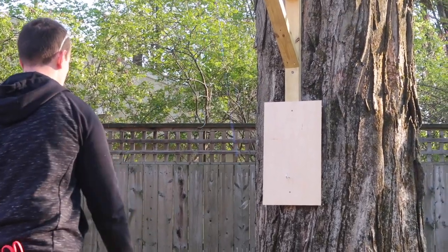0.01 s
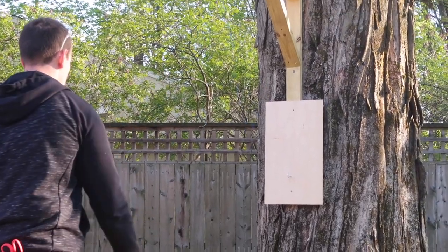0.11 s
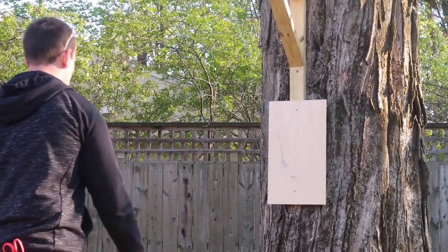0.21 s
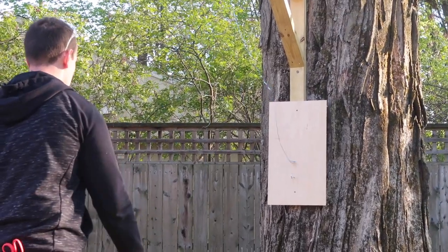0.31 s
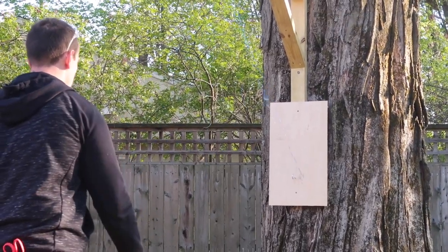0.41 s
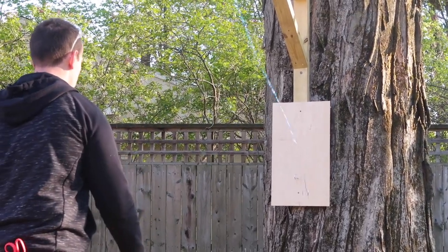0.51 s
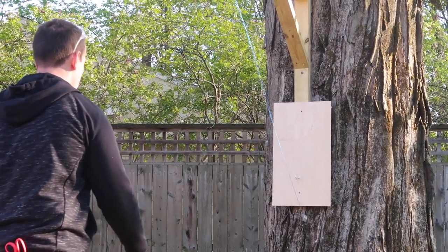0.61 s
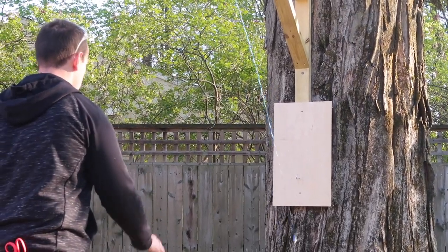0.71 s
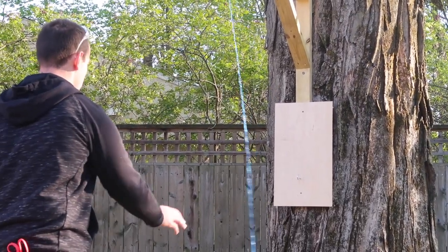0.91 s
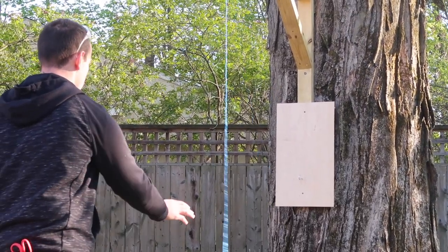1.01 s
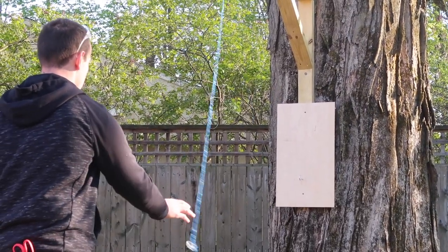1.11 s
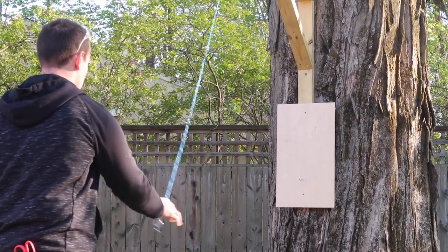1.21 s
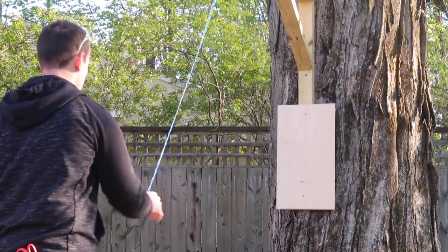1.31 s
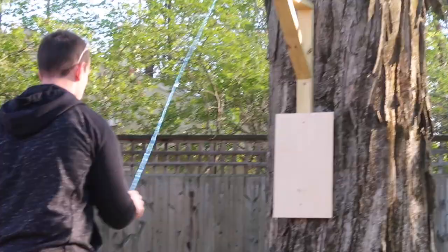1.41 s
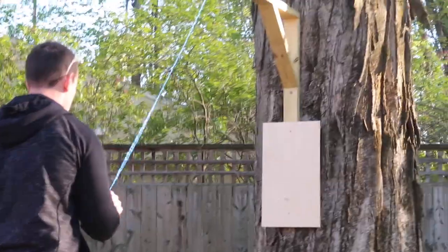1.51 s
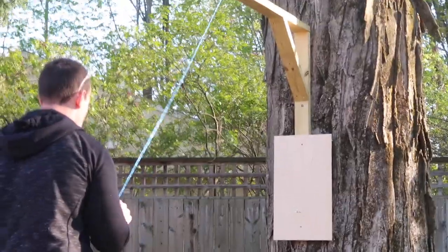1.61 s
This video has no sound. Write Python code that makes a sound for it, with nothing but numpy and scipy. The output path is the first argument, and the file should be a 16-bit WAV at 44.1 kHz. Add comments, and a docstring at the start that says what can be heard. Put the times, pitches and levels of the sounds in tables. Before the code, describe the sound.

One sharp, loud wooden clack at about 0.24 s: a metal ring hits a small board, with a hollow midrange knock and brief noisy crack. Yard echoes follow at once, with a fainter late return near 0.6 s. Low distant traffic, leaves and a wavering engine hum continue, ducked by the blow then recovering. Barely heard ticks come at 0.5 and 1.3 s, a soft rustle at 1.5 s, a clearer small tick at 1.6 s.

```python
"""Metal ring knocking on a hung board

A fenced yard: a metal ring on a string knocks once against a wooden board hung on a tree, and the board clacks.
Fence and houses throw the knock back as single echoes and a diffuse tail; faint ticks and a brief rustle follow.
Distant traffic, leaves and a wavering engine hum lie underneath. Each source is made as mid and side signals from
damped tones or filtered noise. The recorder's gain control ducks at the blow, then lets the background swell back.
"""
import sys
import numpy as np
from scipy import signal
from scipy.io import wavfile

SR = 44100
rng = np.random.default_rng(int(sys.argv[2]) if len(sys.argv) > 2 else 0)


def inscribe(sig):
    """Save sig as 16-bit PCM at rate SR to the path in sys.argv[1].

    A 1-D sig is mono; a 2-D sig holds one channel per row.
    Samples are clipped to [-1, 1] before scaling.
    """
    pcm = np.round(np.clip(np.atleast_2d(sig).T, -1, 1) * 32767)
    wavfile.write(sys.argv[1], SR, pcm.astype(np.int16))


N = 72765

# Distant traffic and leaves, spectrum shape in the centre: pitch_hz, level_db (per Hz, relative)
AIR_MID_SPECTRUM = [(22, -7), (35, -10.5), (70, -8), (120, -5), (200, -7.5), (300, -13), (450, -16.5),
                    (700, -17), (1000, -21), (1400, -24), (2000, -32), (3000, -37), (4000, -39),
                    (5500, -44.5), (9000, -48.5), (10800, -52.5), (12500, -58), (14500, -68)]
# The same at the sides: pitch_hz, level_db (per Hz, relative)
AIR_SIDE_SPECTRUM = [(30, -25), (100, -22), (200, 0.5), (400, 3.5), (700, -2.5), (1400, -4), (3000, -9.5),
                     (5500, -14.5), (9000, -20), (12000, -12.5), (14000, -17), (15500, -22)]
# Distant engine hum over time: start_s, then rms level_db of multiples 1, 2 and 3
HUM_LEVELS = [(0.0, -43.5, -53, -50.5), (0.248, -54, -47, -53), (0.294, -49.5, -47, -63.5),
              (0.55, -49, -42.5, -48), (0.642, -44, -44.5, -63), (0.697, -41.5, -41, -40),
              (0.978, -53, -42.5, -59), (1.158, -48, -49.5, -38.5), (1.29, -44.5, -38, -61),
              (1.478, -49, -74, -46), (1.57, -45.5, -46.5, -53), (1.65, -56, -55, -53)]
# Faint ticks: start_s, level_db (rms at onset), low_hz, high_hz, t60_s, side_minus_mid_db
TICK_BURSTS = [(0.485, -54, 7000, 8740, 0.011, 8), (1.329, -58, 9000, 14000, 0.0094, 13),
               (1.6021, -42.5, 1585, 11000, 0.015, 2)]
# Small body rung by the clearest tick: pitch_hz, level_db (amplitude at onset)
TICK_BODY_MODES = [(1850, -41), (2720, -54), (3640, -55), (4100, -51), (5100, -57)]
# Single echoes of the blow: delay_s, level_db (relative to the blow), thin_below_hz, dull_above_hz
SINGLE_ECHOES = [(.0220, -10.5, 600, 5000), (.035, -19, 1000, 4000), (0.061, -20, 1000, 3500),
                 (.087, -31, 900, 4000), (.112, -28, 700, 3000), (.132, -31, 800, 3000),
                 (.165, -39, 900, 3000), (.309, -36.5, 900, 4000), (0.3511, -22.5, 2750, 6700),
                 (.373, -28.5, 3000, 7000)]
# Diffuse echo of the yard: pitch_hz, level_db (per Hz, relative), t60_s, side_minus_mid_db
YARD_TAIL = [(330, 4, 0.64, -46), (506, -13.5, 0.19, -40), (600, -3.5, 0.24, -43), (1000, 3, 0.28, -35),
             (1350, 0, 0.46, -10), (1960, 4.5, 0.41, -11), (3000, -7.5, 0.46, -8), (5400, -9.5, 0.28, -1.5),
             (8000, -35.5, 0.49, 11), (11000, -29.5, .25, 3), (14000, -50, .25, -1)]
# Modes of the board: pitch_hz, level_db (relative), t60_s
BOARD_MODES = [(345, -23, 0.34), (427, -11.5, 0.072), (492, -2, 0.084), (548, -21.5, 0.056),
               (615, -10, 0.038), (698.3, -18, 0.09), (820, 1, 0.011), (966, -12.5, 0.11),
               (1073, -13, 0.031), (1183, -4.5, 0.017), (1196, -19.5, 0.15), (1360, -16.5, 0.0083),
               (1450, -24.5, 0.19), (1568, -7.5, 0.028), (2092, -19, 0.025), (2720, -16, 0.011),
               (2966, -21.5, 0.018), (3260, -25.5, 0.025)]
# Two further touches as the ring tips flat: delay_s, level_db (relative to the first touch)
LATER_TOUCHES = [(.0015, 5), (.0029, -2)]
# Crack of metal on wood, spectrum shape: pitch_hz, level_db (per Hz, relative)
CRACK_SPECTRUM = [(800, -7), (2000, 4.5), (3200, 0), (4500, -13), (6500, -9.5), (9000, -26.5), (12000, -28),
                  (15000, -58.5)]

HUM_HZ, HUM_WAVER_RADIANS, HUM_WAVER_HZ = 49.67, 0.79, 4.46   # waver radians grow with the multiple
AIR_MID_DB, AIR_SIDE_DB = -43, -58
AIR_PATCHY_DB, AIR_PATCHY_HZ = 1.5, 13.3   # spread and rate of the level drift in each band

RUSTLE_S, RUSTLE_LENGTH_S, RUSTLE_LOW_HZ, RUSTLE_HIGH_HZ = 1.478, 0.065, 5000, 11800
RUSTLE_DB, RUSTLE_SIDE_MINUS_MID_DB = -65, 4

TICK_DULL_HZ, TICK_SIDE_HZ = 1800, 7000   # only the treble of the ticks reaches the sides
TICK_BODY_S, TICK_BODY_T60_S = 1.6021, .018

YARD_DB, YARD_DELAY_S, YARD_RISE_S = -40, .020, 0.0012
SCATTER_HZ, SCATTER_DB = 1550, 18   # above this the yard returns the blow as one uncoloured click
FAR_S, FAR_LENGTH_S, FAR_RISE_S, FAR_DB, FAR_THIN_HZ = .307, 0.08, .003, -65.5, 900

BLOW_S, BLOW_DB = .2361, -3.5
CONTACT_HZ, TOUCH_DULL_HZ = 3800, 2130   # treble limits: all touches, then the softer later ones
RADIATES_FROM_HZ, FLIP_HZ = 324, 1080   # the small board gives off no bass; higher modes start inward
CRACK_DB, CRACK_RISE_S, CRACK_HOLD_S, CRACK_T60_S = -22.5, 0.00051, .004, .034
BLOW_SIDE_DB, BLOW_SIDE_HZ = -18.5, 2500   # the treble of the blow leans a little to one side

DUCK_FROM_DB, DUCK_SLOPE = -8.5, 0.42   # slope: dB of ducking per dB above the threshold
DUCK_ATTACK_S, DUCK_RELEASE_DB_PER_S = 0.0023, 8
OVERLOAD_HARDNESS, CUTOFF_HZ = 4.0, 15500


def from_db(db):
    """Turn decibels into an amplitude gain."""
    return 10 ** (np.asarray(db) / 20)


def rms_one(x):
    """Scale to rms 1."""
    return x / np.sqrt(np.mean(x ** 2) + 1e-20)


def at_hz(points, hz, column=1):
    """Read a table column at a pitch, interpolating on a log-frequency axis."""
    points = np.array(points)
    return np.interp(np.log(hz), np.log(points[:, 0]), points[:, column])


def butter(x, hz, kind, order=2):
    """Apply a Butterworth filter."""
    sos = signal.butter(order, np.clip(hz, 10, .45 * SR), kind, fs=SR, output="sos")
    return signal.sosfilt(sos, x)


def drift(rate_hz):
    """Slow random wander with spread 1: noise through a two-pole low-pass."""
    step = 40   # computed once per 40 samples, then interpolated
    r = np.exp(-2 * np.pi * rate_hz * step / SR)
    noise = rng.standard_normal(N // step + 2002)
    slow = signal.lfilter([1], [1, -2 * r, r * r], noise)[2000:]   # drop the filter's run-in
    return np.interp(np.arange(N) / step, np.arange(len(slow)), rms_one(slow))


def bands(size, gain):
    """Sum third-octave bands of noise, each times gain(centre_hz)."""
    run_in = SR // 4
    edges = 22 * 2 ** np.arange(0, 9.7, 1 / 3)
    white = rng.standard_normal((2, size + run_in))   # neighbouring bands use separate noises
    total = 0
    for k, (low, high) in enumerate(zip(edges, edges[1:])):
        band = butter(white[k % 2], [low, high], "band")[run_in:]
        total = total + gain(np.sqrt(low * high)) * band
    return total


def later(x, s):
    """Start x at time s, within the length of the scene."""
    return np.concatenate([np.zeros(int(s * SR)), x, np.zeros(N)])[:N]


def air(spectrum, level_db):
    """Distant traffic and leaves: broadband noise whose bands drift gently in level."""
    def gain(hz):
        return from_db(at_hz(spectrum, hz) + AIR_PATCHY_DB * drift(AIR_PATCHY_HZ))
    return from_db(level_db) * rms_one(bands(N, gain))


def hum():
    """Distant engine: three multiples of its beat, each wavering in phase on its own."""
    t = np.arange(N) / SR
    start_s, *levels = np.transpose(HUM_LEVELS)
    total = np.zeros(N)
    for multiple, level_db in enumerate(levels, start=1):
        amplitude = np.sqrt(2) * from_db(np.interp(t, start_s, level_db))
        waver = multiple * HUM_WAVER_RADIANS * drift(HUM_WAVER_HZ)
        phase = 2 * np.pi * multiple * HUM_HZ * t + rng.uniform(0, 2 * np.pi) + waver
        total += amplitude * np.sin(phase)
    return total


def background():
    """Broadband air in mid and side, with the hum in the middle."""
    mid = air(AIR_MID_SPECTRUM, AIR_MID_DB) + hum()
    side = air(AIR_SIDE_SPECTRUM, AIR_SIDE_DB)
    return np.array([mid, side])


def rustle():
    """A soft swell and fade of treble noise; mid and side."""
    swell = later(np.hanning(int(RUSTLE_LENGTH_S * SR)), RUSTLE_S)
    noise = butter(rng.standard_normal((2, N)), [RUSTLE_LOW_HZ, RUSTLE_HIGH_HZ], "band")
    levels_db = [[RUSTLE_DB], [RUSTLE_DB + RUSTLE_SIDE_MINUS_MID_DB]]
    return from_db(levels_db) * rms_one(noise) * swell


def ticks():
    """Short decaying noise bursts, the clearest with a few damped tones; mid and side."""
    t = np.arange(SR // 20) / SR
    out = np.zeros((2, N))
    for start_s, level_db, low_hz, high_hz, t60_s, side_db in TICK_BURSTS:
        mid, side = rng.standard_normal((2, len(t)))
        fade = from_db(level_db - 60 * t / t60_s)
        mid = butter(mid, [low_hz, high_hz], "band", order=3)
        mid = butter(mid, TICK_DULL_HZ, "low", order=1)
        side = butter(side, TICK_SIDE_HZ, "high")
        out[0] += later(rms_one(mid) * fade, start_s)
        out[1] += later(rms_one(side) * fade * from_db(side_db), start_s)
    for k, (pitch_hz, level_db) in enumerate(TICK_BODY_MODES):
        fade = from_db(level_db - 60 * t / TICK_BODY_T60_S)
        tone = (-1) ** k * np.sin(2 * np.pi * pitch_hz * t)   # alternate modes start the other way
        out[0] += later(fade * tone, TICK_BODY_S)
    return out


def single_echoes(knock):
    """Separate returns: delayed, thinned and dulled copies of the blow."""
    return sum(later(from_db(level_db) * butter(knock, [thin_hz, dull_hz], "band", order=1), delay_s)
               for delay_s, level_db, thin_hz, dull_hz in SINGLE_ECHOES)


def far_echo(knock, t):
    """A late return: the thinned blow smeared by a short swell of noise."""
    swell = (1 - np.exp(-t / FAR_RISE_S)) * np.exp(-(t / FAR_LENGTH_S) ** 4)
    smear = swell * rng.standard_normal(len(t))
    thin = butter(knock, FAR_THIN_HZ, "high")
    return later(from_db(FAR_DB) * signal.fftconvolve(thin, smear), FAR_S)


def yard(knock):
    """Single and far echoes in the centre, plus a diffuse tail dying band by band; mid and side."""
    t = np.arange(SR // 2) / SR

    def mid_gain(hz):
        return from_db(at_hz(YARD_TAIL, hz) - 60 * t / at_hz(YARD_TAIL, hz, column=2))

    def side_gain(hz):
        return mid_gain(hz) * from_db(at_hz(YARD_TAIL, hz, column=3))

    rise = from_db(YARD_DB) * (1 - np.exp(-t / YARD_RISE_S))
    mid_tail = rise * bands(len(t), mid_gain)
    side_tail = rise * bands(len(t), side_gain)
    click = butter(1. * (t == 0), SCATTER_HZ, "high", order=4)
    feed = butter(knock, SCATTER_HZ, "low", order=4) + from_db(SCATTER_DB) * click
    mid = later(signal.fftconvolve(feed, mid_tail), YARD_DELAY_S)
    side = later(signal.fftconvolve(feed, side_tail), YARD_DELAY_S)
    return single_echoes(knock) + far_echo(knock, t) + mid, side


def board(t):
    """Damped modes of the board, rung by the ring's first touch and two softer-edged later ones."""
    first = np.zeros(len(t))
    for pitch_hz, level_db, t60_s in BOARD_MODES:
        fade = from_db(level_db - 60 * t / t60_s)
        first += np.sign(FLIP_HZ - pitch_hz) * fade * np.sin(2 * np.pi * pitch_hz * t)
    soft = butter(first, TOUCH_DULL_HZ, "low", order=1)
    touches = sum(from_db(level_db) * later(soft, delay_s)[:len(t)] for delay_s, level_db in LATER_TOUCHES)
    return butter(first + touches, CONTACT_HZ, "low")


def crack(t):
    """Metal on wood: shaped noise that rises fast, holds briefly and dies away."""
    noise = rms_one(bands(len(t), lambda hz: from_db(at_hz(CRACK_SPECTRUM, hz))))
    fade = from_db(CRACK_DB - 60 * np.maximum(t - CRACK_HOLD_S, 0) / CRACK_T60_S)
    rise = 1 - np.exp(-(t / CRACK_RISE_S) ** 2)
    return noise * fade * rise


def blow():
    """The board's ring and the noisy crack, without the bass a small board cannot radiate; starts at zero."""
    t = np.arange(SR // 2) / SR
    return butter(from_db(BLOW_DB) * board(t) + crack(t), RADIATES_FROM_HZ, "high", order=3)


def scene():
    """Sum all sources as mid and side, then turn them into left and right."""
    knock = blow()
    echo_mid, echo_side = yard(knock)
    lean = from_db(BLOW_SIDE_DB) * butter(knock, BLOW_SIDE_HZ, "high", order=1)
    hit_mid = later(knock, BLOW_S) + later(echo_mid, BLOW_S)
    hit_side = later(lean, BLOW_S) + later(echo_side, BLOW_S)
    mid, side = background() + rustle() + ticks() + np.array([hit_mid, hit_side])
    return np.array([mid + side, mid - side])


def record(dry):
    """Gain control ducks on loud peaks and recovers slowly; peaks round off at full scale; the top is cut."""
    peak_db = 20 * np.log10(np.abs(dry).max(axis=0) + 1e-9)   # the louder channel steers both
    duck_db = np.maximum(peak_db - DUCK_FROM_DB, 0) * DUCK_SLOPE
    # a running maximum on a rising ramp makes the ducking fall back at a steady dB per second
    ramp = DUCK_RELEASE_DB_PER_S * np.arange(N) / SR
    held_db = np.maximum.accumulate(duck_db + ramp) - ramp
    r = np.exp(-1 / (DUCK_ATTACK_S * SR))
    smooth_db = signal.lfilter([1 - r], [1, -r], held_db)
    ducked = dry * from_db(-smooth_db)
    rounded = ducked / (1 + np.abs(ducked) ** OVERLOAD_HARDNESS) ** (1 / OVERLOAD_HARDNESS)
    top_cut = signal.cheby2(12, 70, CUTOFF_HZ, fs=SR, output="sos")
    return signal.sosfilt(top_cut, rounded)


dry = scene()
out = record(dry)
inscribe(out)
```